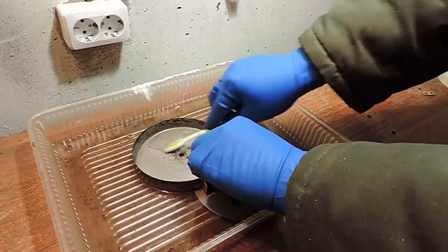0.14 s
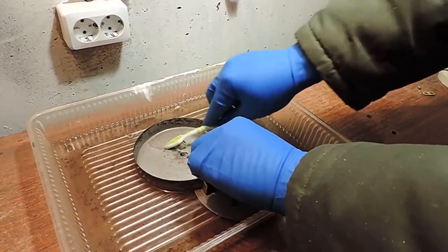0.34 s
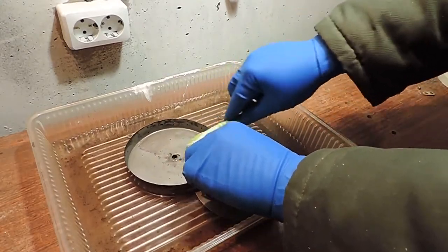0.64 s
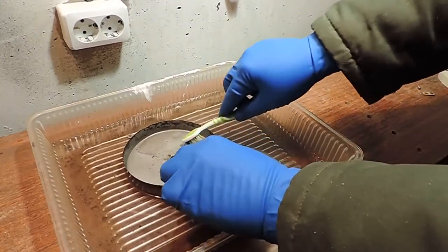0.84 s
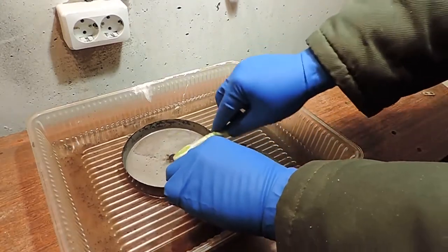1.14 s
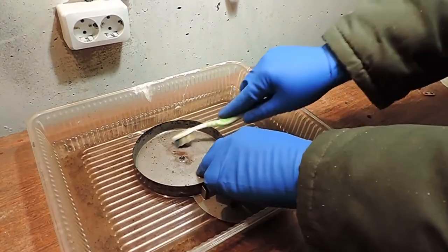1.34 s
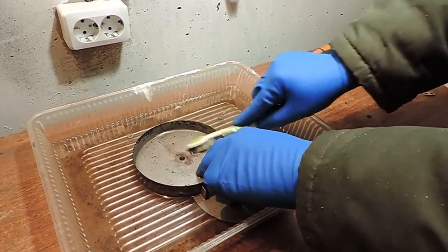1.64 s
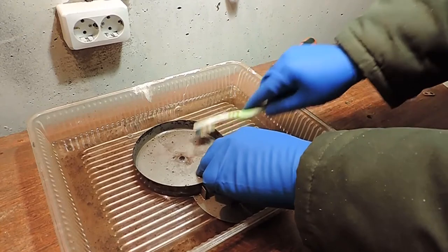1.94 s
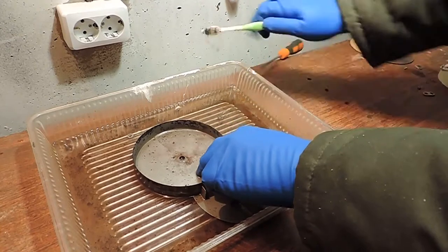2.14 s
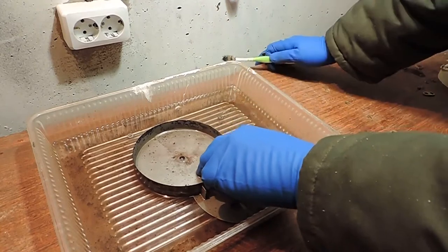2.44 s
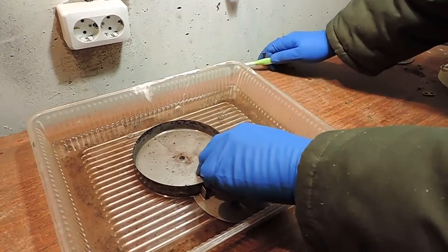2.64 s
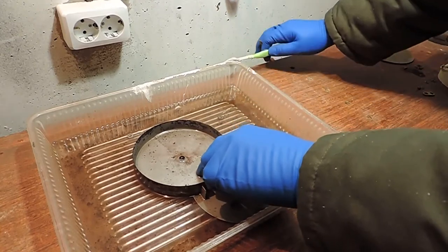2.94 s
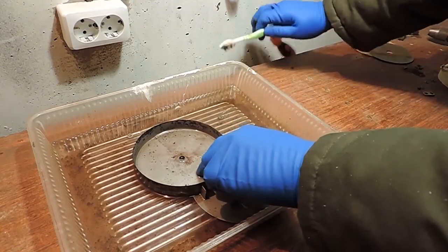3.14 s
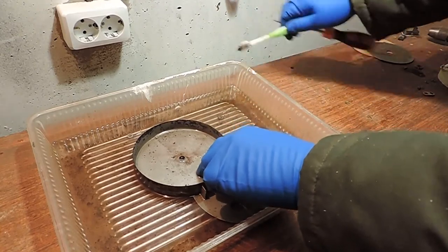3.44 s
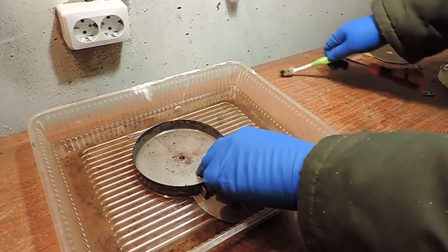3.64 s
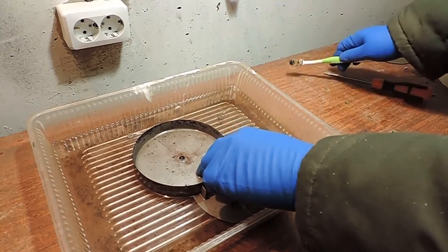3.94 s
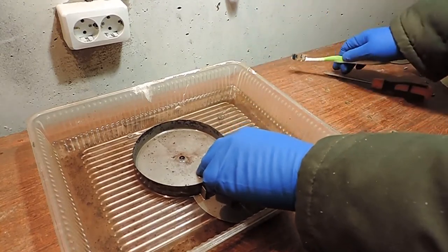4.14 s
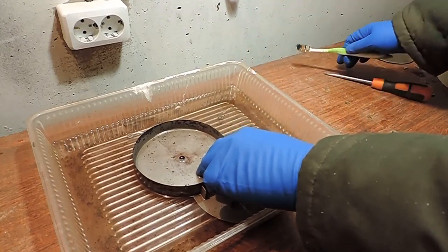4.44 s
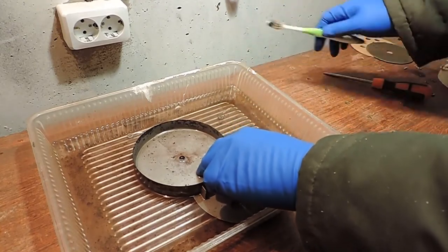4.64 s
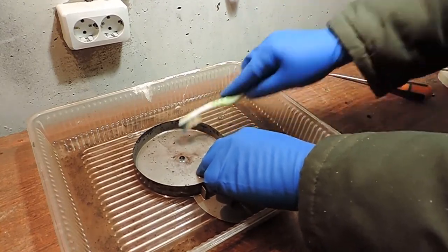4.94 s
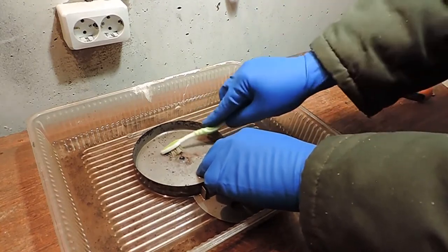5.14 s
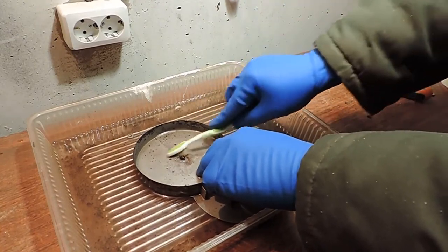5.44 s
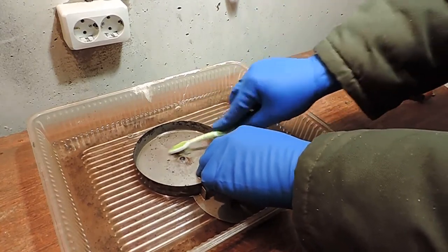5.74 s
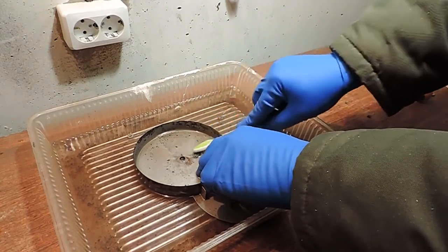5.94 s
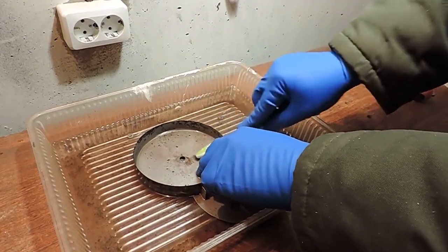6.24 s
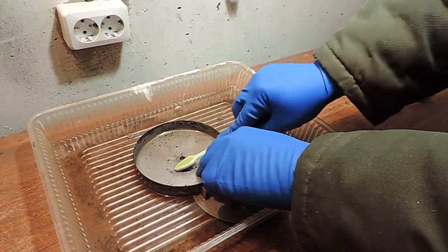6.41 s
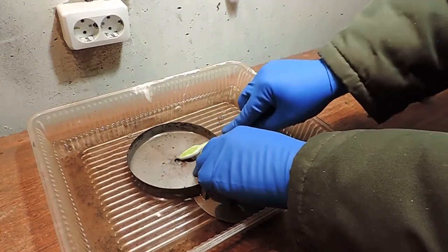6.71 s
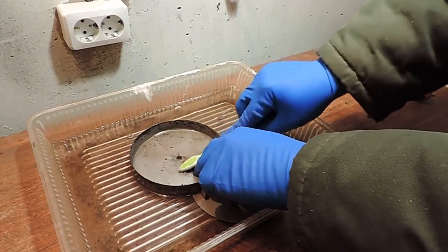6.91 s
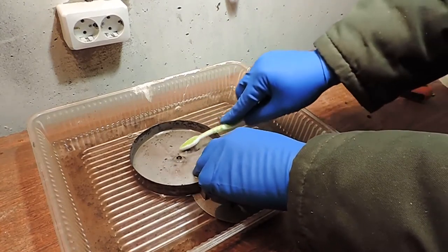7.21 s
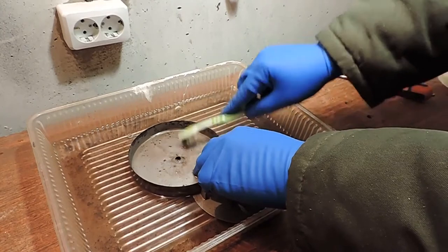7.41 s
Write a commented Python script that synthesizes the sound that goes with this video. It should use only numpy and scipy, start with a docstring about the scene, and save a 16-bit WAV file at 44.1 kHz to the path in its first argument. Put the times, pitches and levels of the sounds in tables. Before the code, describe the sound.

Short toothbrush rasps on a thin steel dish, with handle taps, soft tray thuds and one abrupt digital-sounding click. Midway, tools strike the bench very loudly, something scrapes briefly, and a screwdriver lands with quickly fading bounces. The camera's level dips after each big bang and creeps back. Regular, duller scrubbing with ringing knocks ends the scene, in a small reverberant workshop with low rumble and faint air noise.

```python
"""Short brush strokes hiss and rasp on a ringing steel dish, amid taps, thuds and clattering tools.
A toothbrush scrubs the shallow dish over a plastic tray on a wooden workbench, in a small hard-walled shed.
Every source but one hard click, heard early on, is shaped noise: swelling for strokes, dying rattles for
blows, uneven grit for the dragged tool. The camera turns itself down after loud knocks."""
import sys
import numpy as np
from scipy import signal
from scipy.fft import rfft, irfft, next_fast_len
from scipy.io import wavfile
from scipy.ndimage import uniform_filter1d, map_coordinates

SR = 44100
rng = np.random.default_rng(int(sys.argv[2]) if len(sys.argv) > 2 else 0)


def master(y):
    """Save y as 16-bit WAV."""
    cut = np.clip(np.atleast_2d(y).T, -1, 1)
    pcm = np.round(cut * 32767)  # scale
    wavfile.write(sys.argv[1], SR, pcm.astype(np.int16))


N = 333837
T = np.arange(N) / SR
DISH_CHANGE_S = 1.32  # until then the dish rings with one set of resonances, afterwards with another

# Resonances of the dish until 1.32 s. Each row: centre in Hz, width in Hz, level in dB.
EARLY_DISH_MODES = [(474, 64, 4.5), (1124, 32, 4), (1500, 46, -9.5), (1660, 25, -17.5), (1968, 130, -5),
                    (2480, 96, -4), (2840, 53, -4), (3430, 50, -16)]
# Resonances of the dish from 1.32 s on. Each row: centre in Hz, width in Hz, level in dB.
LATE_DISH_MODES = [(329, 23, -0.5), (765.5, 21, -2), (970, 40, -16.5), (1300, 19, -11), (2360, 41, -22.5)]
# Resonances of the bench top and, above 4 kHz, of a bright thing knocked on it.
# Each row: centre in Hz, width in Hz, level in dB.
BENCH_AND_BRIGHT_MODES = [(485, 41, 2), (516.6, 38, -1.5), (730, 69, -6.5), (830, 160, -4.5),
                          (1115, 100, 8), (1250, 84, -2), (1500, 280, 2.5), (1685, 70, 1.5),
                          (2080, 400, -1.5), (2340, 190, -7.5), (4300, 640, -2.5), (7370, 340, -7),
                          (9800, 800, -2.5)]


def amp(db):
    """Gain of a level in dB."""
    return 10 ** (np.asarray(db) / 20)


def unit(x):
    """x at rms 1."""
    return x / np.sqrt(np.mean(x ** 2) + 1e-20)


def peak(x):
    """x at peak 1."""
    return x / np.abs(x).max()


def along(points, hz):
    """Reads a curve of (Hz, value) points on a log frequency axis."""
    f, v = np.transpose(points)
    return np.interp(np.log(hz + 1), np.log(f + 1), v)


def filtered(x, response):
    """x shaped by a complex response of frequency."""
    m = next_fast_len(x.shape[-1] + 8192)
    spectrum = rfft(x, m) * response(np.fft.rfftfreq(m, 1 / SR))
    return irfft(spectrum, m)[..., :x.shape[-1]]


def body(modes, between_db):
    """Response of an object: resonances summed over a flat floor."""
    def response(f):
        ringing = sum(amp(db) * 1j * f * w / (c * c - f * f + 1j * f * w) for c, w, db in modes)
        return amp(between_db) + ringing
    return response


def band(centre_hz, q):
    """Response of a single resonance, broad at low q."""
    return lambda f: 1j * f * centre_hz / q / (centre_hz ** 2 - f * f + 1j * f * centre_hz / q)


def dull(hz):
    """Response of a treble cut above hz, 12 dB an octave."""
    return lambda f: 1 / (1 + 1j * f / hz / 0.51 - (f / hz) ** 2)


def wobble(rate):
    """A smooth random curve, rate knots a second."""
    return map_coordinates(rng.standard_normal(int(N * rate / SR) + 4), [T * rate])


def grit(spread_db):
    """Two unrelated streams of dense slips of uneven size."""
    return rng.standard_normal((2, N)) * amp(spread_db * np.array([wobble(900), wobble(900)]))


def patchy(pair, patch_db):
    """A pair of noises with random gain patches in time and frequency, shared by both."""
    z = signal.stft(pair, nperseg=256)[2]
    field = uniform_filter1d(rng.standard_normal(z.shape[1:]), size=6, axis=0)
    field = uniform_filter1d(field, size=8, axis=1)
    return signal.istft(z * amp(patch_db * unit(field)), nperseg=256)[1][:, :N]


def rush(pair, response, alike):
    """A pair of noises coloured and mixed to a left-right likeness, rms 1."""
    turn = lambda hz: np.arccos(np.clip(along(alike, hz), -1, 1)) / 2
    mid, side = filtered(pair, lambda hz: response(hz) * [np.cos(turn(hz)), np.sin(turn(hz))])
    return unit(np.array([mid + side, mid - side]))


def brush():
    """Each stroke swells and fades: bristle tips hiss, the tufts make the dish ring."""
    # Each row: start in seconds, length in seconds, bristle hiss in dB.
    strokes = [(0.007, 0.066, -55), (0.109, 0.043, -53.5), (0.192, 0.053, -52), (0.277, 0.052, -54),
               (0.375, 0.052, -50), (0.464, 0.0344, -55), (0.539, 0.049, -54), (0.625, 0.028, -58),
               (0.652, 0.15, -60.5), (1.057, 0.052, -63.5), (1.12, 0.029, -54.5), (1.178, 0.039, -49.5),
               (1.254, 0.008, -49.5), (1.577, 0.048, -64.5), (1.693, 0.084, -55), (1.844, 0.11, -56.5),
               (2.038, 0.086, -52), (5.252, 0.1, -63.5), (5.426, 0.083, -52), (5.582, 0.1, -56),
               (5.75, 0.082, -51), (5.904, 0.093, -53.5), (6.067, 0.071, -49), (6.203, 0.09, -55),
               (6.364, 0.079, -51.5), (6.502, 0.073, -51.5), (6.652, 0.084, -53), (6.79, 0.053, -51.5),
               (6.941, 0.06, -58), (7.039, 0.076, -57.5), (7.215, 0.1, -52.5), (7.388, 0.063, -55),
               (7.466, 0.11, -57)]
    # Spectrum of the bristle tips. Each row: frequency in Hz, relative level in dB per Hz.
    tip_spectrum = [(1470, -20), (2500, -12.5), (4110, -5.5), (4410, -7.5), (5110, -6), (7420, -8),
                    (13300, -4), (14900, -5), (16000, -16.5)]
    # Force of the bristle tufts. Each row: frequency in Hz, relative level in dB per Hz.
    tuft_spectrum = [(100, -46.5), (200, -4.5), (500, -2.5), (1500, 3), (3000, -3), (5000, -19.5)]
    # Stereo spread of the strokes. Each row: frequency in Hz, left-right likeness (1 is mono).
    stroke_alike = [(60, 0.76), (180, 0.36), (550, 0.57), (1650, 0.86), (4970, 0.14), (15000, 0.063)]
    rasp_early_db, rasp_later_db = -49, -51.5  # dish rasp of a stroke that hisses at -55 dB, before and after 1.32 s
    rasp_follows = .6  # dB of rasp per dB of hiss

    hiss_level, rasp_level = np.zeros(N), np.zeros(N)
    for start, length, hiss_db in strokes:
        rasp_db = rasp_early_db if start < DISH_CHANGE_S else rasp_later_db
        rasp_db += rasp_follows * (hiss_db + 55)
        u = (T - start) / length - .48
        # steady sweep, brief halt at each turn
        shape = amp(-6 * np.abs(u / np.where(u < 0, .62, .58)) ** 2.63)
        hiss_level += amp(hiss_db) * shape
        rasp_level += amp(rasp_db) * shape

    uneven = wobble(60)
    tip_grit = patchy(grit(spread_db=0.5), patch_db=3.0)
    tips = rush(tip_grit, lambda f: amp(along(tip_spectrum, f)), stroke_alike)
    force = grit(spread_db=1.5)
    early_dish = body(EARLY_DISH_MODES, between_db=-9)
    late_dish = body(LATE_DISH_MODES, between_db=-9)
    early = rush(force, lambda f: amp(along(tuft_spectrum, f)) * early_dish(f), stroke_alike)
    # from 1.32 s on, the dish rasps duller
    duller_db = lambda f: along(tuft_spectrum, f) - 5.8 * np.log2(1 + f / 1000)
    later = rush(force, lambda f: amp(duller_db(f)) * late_dish(f), stroke_alike)
    rasp = np.where(T < DISH_CHANGE_S, early, later)
    return hiss_level * amp(0.4 * uneven) * tips + rasp_level * amp(1.6 * uneven) * rasp


def flicks():
    """Tufts of bristles spring free: short bright spits of noise."""
    # Each row: start in seconds, peak in dB, centre in Hz.
    springs = [(.385, -39.5, 9310), (.545, -39, 10920), (1.263, -36, 5845), (6.076, -39, 10330),
               (6.677, -35.5, 12360), (7.059, -37, 13500)]
    t60 = .033  # s
    out, t = np.zeros(N + SR), np.arange(SR // 10) / SR
    for s, db, hz in springs:
        burst = rng.standard_normal(len(t)) * amp(-60 * t / t60) * (1 - np.exp(-t / .003))
        spit = filtered(burst, lambda f: band(hz, 1.3)(f) ** 2)
        out[round(s * SR):][:len(t)] += amp(db) * peak(spit)
    return out[:N]


def blows(rows, response, q, thud_hz, thud_db):
    """Each blow is a dying rattle: a broad band rings the object over a low thud, a crack rides on top.

    Each row: start in seconds, ring peak in dB, centre in Hz, rattle t60 in seconds, crack against ring in dB.
    thud_db is the thud against the ring for a -30.5 dB blow centred on 1 kHz."""
    soft_thud = .45  # dB of thud gained per dB that a blow is under -30.5 dB
    tinny_db = 5.5  # thud lost per octave of centre over 1 kHz
    settle_db, settle_longer = -19, 4.6  # the struck thing chatters on, weaker and longer than the blow
    strike_s = .0015  # longest attack time constant
    out, t = np.zeros(N + SR), np.arange(SR // 3) / SR
    for s, db, hz, t60, crack_db in rows:
        # soft and dull blows are mostly thud
        low_db = thud_db + soft_thud * (-30.5 - db) - tinny_db * np.log2(hz / 1000)
        fall = amp(-60 * (t / t60) ** 1.335) + amp(settle_db - 60 * t / (settle_longer * t60))
        attack = 1 - np.exp(-t / min(0.067 * t60, strike_s))
        rattle = rng.standard_normal((3, len(t))) * fall * attack
        ring = filtered(rattle[0], lambda f: response(f) * band(hz, q)(f) * dull(1.8 * hz)(f) * dull(2.6 * hz)(f))
        crack = filtered(rattle[1], lambda f: band(5000, .8)(f) * dull(7000)(f) * response(f))
        thud = filtered(rattle[2], lambda f: (band(thud_hz, .8)(f) ** 2 * dull(600)(f)
                                              + 2.2 * band(335, 8)(f) * dull(500)(f)))
        blow = peak(ring) + amp(crack_db) * peak(crack) + amp(low_db) * peak(thud)
        out[round(s * SR):][:len(t)] += amp(db) * blow
    return out[:N]


def dish():
    """Handle and knuckles tap the dish, ringing it with the resonances it has at that moment."""
    # Each row: start in seconds, ring peak in dB, centre in Hz, rattle t60 in seconds.
    taps = [(0.562, -38, 1878, .04), (.615, -26, 1260, .035), (0.625, -24.5, 2310, .06),
            (.642, -26, 2380, .08), (0.948, -47, 1500, .06), (1.078, -38, 1460, .08),
            (1.194, -27.5, 2000, .045), (1.203, -32, 1800, 0.076), (1.264, -22, 2103, 0.02),
            (5.397, -49.5, 1500, .05), (6.674, -39, 1500, 0.1), (6.804, -27.5, 1250, .1),
            (6.82, -26, 1360, .16), (6.949, -39, 1180, 0.13), (7.24, -34.5, 1250, .14),
            (7.429, -27.5, 1290, 0.081), (7.479, -42, 1500, .05)]
    crack_db, thud_db = -25.5, -9.5  # against the ring
    early = [(*row, crack_db) for row in taps if row[0] < DISH_CHANGE_S]
    later = [(*row, crack_db) for row in taps if row[0] >= DISH_CHANGE_S]
    early_dish = body(EARLY_DISH_MODES, between_db=-8)
    late_dish = body(LATE_DISH_MODES, between_db=-5.5)
    return (blows(early, early_dish, q=1.0, thud_hz=295, thud_db=thud_db)
            + blows(later, late_dish, q=0.98, thud_hz=247, thud_db=thud_db))


def tray():
    """The tray shifts and thuds under the dish, through the same resonances as the knocks on the bench."""
    # Each row: start in seconds, ring peak in dB, centre in Hz, rattle t60 in seconds.
    shifts = [(1.339, -48, 585, .04), (1.491, -49.5, 1170, .02), (1.511, -28, 1520, .11),
              (1.62, -47.5, 701.6, .04), (1.947, -39, 908, .075), (2.115, -42, 644, .05),
              (2.159, -39, 736, 0.05), (2.22, -52, 618, .08), (2.259, -41, 703, .08),
              (2.309, -48, 600, .11), (2.405, -39.5, 799, .1), (4.713, -65, 600, 0.1)]
    rows = [(*row, -36.5) for row in shifts]  # crack against the ring, dB
    return blows(rows, body(BENCH_AND_BRIGHT_MODES, between_db=-2.5), q=1.0, thud_hz=220, thud_db=-3)


def knocks():
    """Tools strike the bench: its top rings, and a bright thing knocked on it rings above 4 kHz."""
    # Each row: start in seconds, ring peak in dB, centre in Hz, rattle t60 in seconds, crack against ring in dB.
    strikes = [(2.466, -2.5, 1150, 0.067, -30.5), (2.489, -14, 1050, 0.089, -19),
               (2.51, -19, 1100, 0.2, -38.5), (2.54, -17.5, 950, .1, -9), (2.575, -21.5, 950, .06, -13.5),
               (2.6, -29, 828, 0.036, -26), (2.921, -38, 2128, .03, -43), (3.825, -35.5, 2000, .05, -9),
               (3.867, -1, 1396, 0.074, -38)]
    return blows(strikes, body(BENCH_AND_BRIGHT_MODES, between_db=-5), q=0.67, thud_hz=200, thud_db=-2)


def screwdriver():
    """A screwdriver lands and bounces three times, each flight shorter and each contact weaker."""
    # Resonances of the screwdriver. Each row: centre in Hz, width in Hz, level in dB.
    driver_modes = [(892, 150, -6.5), (1280, 250, 6.5), (1500, 91, 4.5), (2447, 240, 10.5), (4020, 210, -1),
                    (5220, 260, 5.5), (6500, 58, 7)]
    lands_s, lands_db, loss_db = 4.042, 1.5, 11  # landing time, its ring peak, loss a bounce
    flight_s, shrink = .072, 0.55  # first flight, each next flight over the one before
    centre_hz, t60, crack_db = 1670, .028, -21.5
    contacts = []
    for k in range(4):
        flown_s = flight_s * (1 - shrink ** k) / (1 - shrink)
        contacts.append((lands_s + flown_s, lands_db - loss_db * k, centre_hz, t60, crack_db))
    return blows(contacts, body(driver_modes, between_db=-5.5), q=0.46, thud_hz=335, thud_db=4)


def drag():
    """Gritty slips of a sliding tool; the sound moves to a deeper band as more of it lies on the bench."""
    # Each row: time in seconds, level in dB.
    slide_level = [(3, -66.5), (3.062, -49.5), (3.072, -40), (3.165, -37), (3.197, -43), (3.212, -31.5),
                   (3.249, -38.5), (3.3, -47), (3.4, -64.5)]
    # Resonances of the tool on the wood. Each row: centre in Hz, width in Hz, level in dB.
    slide_modes = [(332, 21, 1.5), (735, 84, -3.5), (935, 27, -4.5), (1055, 24, 3.5), (1250, 23, -18.5),
                   (1410, 35, -0.5), (1693, 31, -14.5), (2090, 150, -24.5)]
    tips_flat_s, tipping_s = 3.19, .05  # when and how fast the tool comes to lie flat
    s, db = np.transpose(slide_level)
    low_share = np.clip(.5 + (T - tips_flat_s) / tipping_s, .05, .92)
    wood = body(slide_modes, between_db=-7)
    force = filtered(grit(spread_db=0.5), lambda f: wood(f) * dull(2200)(f) ** 2)
    high = unit(filtered(force[0], lambda f: band(1150, 1.2)(f) ** 2))
    deep = unit(filtered(force[1], lambda f: band(450, .6)(f) * dull(1100)(f)))
    level = amp(np.interp(T, s, db, -120, -120) + 2.0 * wobble(42))
    return level * (np.sqrt(1 - low_share) * high + np.sqrt(low_share) * deep)


def background():
    """Noise beds: deep shaking of the bench under the hands, boom of the tray, steady air."""
    # Each row: time in seconds, deep level in dB, tray boom level in dB.
    rumble = [(0, -66, -69), (.25, -65, -58), (.63, -61, -65.5), (1.07, -67, -65.5), (1.399, -75, -56.5),
              (2, -67.5, -53.5), (2.45, -71, -54.5), (2.58, -39.5, -37), (2.68, -44, -46),
              (2.759, -56, -61), (2.9, -65.5, -64), (3.06, -65, -57), (3.24, -57, -52.5), (3.44, -68, -74),
              (3.8, -69.5, -59), (4.071, -51.5, -52), (4.35, -70.5, -73), (4.55, -66, -74), (4.9, -64, -68),
              (5.2, -68, -71), (5.6, -68, -61.5), (6.4, -71, -64.5), (6.94, -52, -52), (7.23, -68, -72.5),
              (7.57, -69, -59)]
    # Spectrum of the deep shaking. Each row: frequency in Hz, relative level in dB per Hz.
    deep_spectrum = [(10, -9), (22, 3), (60, 2), (100, -17), (200, -68)]
    # Spectrum of the tray boom. Each row: frequency in Hz, relative level in dB per Hz.
    boom_spectrum = [(50, -45.5), (100, 2), (220, -2), (330, 3.5), (400, -16.5), (800, -41)]
    # Room tone and microphone hiss. Each row: frequency in Hz, relative level in dB per Hz.
    air_spectrum = [(180, -35), (300, 0), (360, -3), (494, -7.5), (870, -9), (1560, -11), (14500, -33),
                    (16000, -32)]

    def noise(spectrum, alike):
        """Steady stereo noise at rms 1."""
        return rush(rng.standard_normal((2, N)), lambda f: amp(along(spectrum, f)), alike)

    s, deep_db, boom_db = np.transpose(rumble)
    deep = amp(np.interp(T, s, deep_db) + 1.8 * wobble(4.1)) * noise(deep_spectrum, [(50, 0.86)])
    boom = amp(np.interp(T, s, boom_db) + 3.8 * wobble(20)) * noise(boom_spectrum, [(200, 0.99)])
    air = amp(-64.5) * noise(air_spectrum, [(300, 0.35), (1400, 0.35), (4000, 0.024)])
    return deep + boom + air


def shed(x):
    """The walls answer with a noise tail in which each frequency dies at its own speed."""
    # Each row: frequency in Hz, t60 in seconds.
    decay = [(100, 0.43), (700, 0.43), (2000, 0.41), (10000, 0.19)]
    # Stereo spread of the walls. Each row: frequency in Hz, left-right likeness (1 is mono).
    walls_alike = [(100, 0.89), (500, 1), (1500, 0.63), (4000, 0)]
    hz, t, z = signal.stft(rng.standard_normal((2, SR // 2)), SR, nperseg=256)
    dying = z * amp(-60 * t / along(decay, hz)[:, None])
    tail = rush(signal.istft(dying, SR, nperseg=256)[1], np.ones_like, walls_alike)
    late = np.pad(x, (200, 0))[None]  # samples until the walls answer
    return signal.fftconvolve(late, tail / np.linalg.norm(tail[0]), axes=1)[:, :N]


def ports(x, side_db):
    """Close reflections off tray and wall reach the two microphone ports unequally, most around 2.3 kHz."""
    scatter = rng.standard_normal(400) * amp(-60 * np.arange(400) / SR / 0.008)
    reflected = signal.fftconvolve(x, scatter / np.linalg.norm(scatter))[:N]
    side = filtered(reflected, band(2300, 0.3))
    side = side - x * (side @ x) / (x @ x)  # the scatter widens the sound without pulling it to one side
    return x + amp(side_db) * np.array([side, -side])


def scene():
    """Dish and tray close in front, tools further back on the bench, all in the shed."""
    strokes = brush()
    near = dish() + tray() + flicks()
    bench, driver, slide = knocks(), screwdriver(), drag()
    walls = amp(-9.0) * shed(near) + amp(-4) * shed(bench) + amp(-6.5) * shed(driver + slide)
    walls += amp(-12) * shed(strokes.mean(0))
    tools = ports(bench + driver + slide, side_db=-7) * amp([[.4], [-.4]])  # slightly to the left
    return ports(near, side_db=-8.5) + tools + strokes + walls + background()


def record(dry):
    """The camera's gain ducks over a threshold and creeps back, and its input rounds off peaks.

    A brief flat pulse, heard as a hard click, then replaces the sound; the treble is band-limited."""
    click_s, click_ms = 1.32090, .345
    top_hz, click_top_hz = 15800, 17000  # band limits before and after the click is put in
    level_db = 10 * np.log10(np.abs(uniform_filter1d(np.mean(dry ** 2, 0), 900)) + 1e-12)
    duck_db = np.minimum(0, 0.59 * (-26.5 - level_db))
    back_db = 11 * T  # recovery, dB a second
    gain_db = np.minimum.accumulate(duck_db - back_db) + back_db
    gain_db = uniform_filter1d(np.pad(gain_db, (1200, 0))[:N], 1500)  # it reacts late, so attacks pass
    wet = dry * amp(gain_db)
    wet = wet / (1 + np.abs(wet / .5) ** 4) ** .25  # the input stage rounds off the loudest peaks
    wet = filtered(wet, lambda hz: hz < top_hz)
    wet[:, (T > click_s) & (T < click_s + click_ms / 1000)] = -.98
    return np.clip(filtered(wet, lambda hz: np.clip((click_top_hz - hz) / 1200, 0, 1)), -1, 1)


dry = scene()
out = record(dry)
master(out)
```